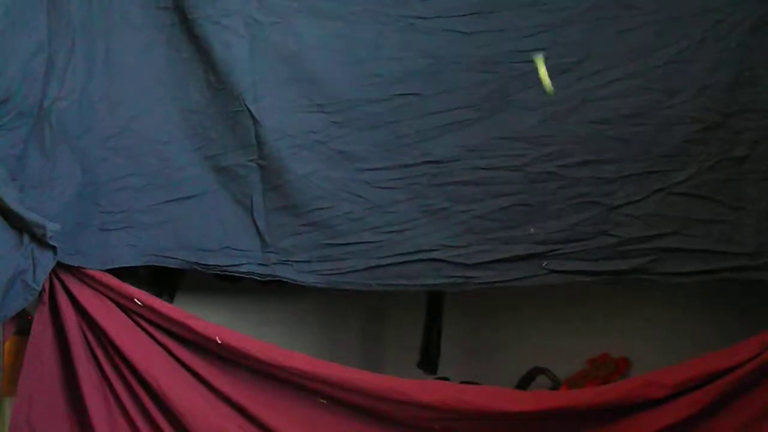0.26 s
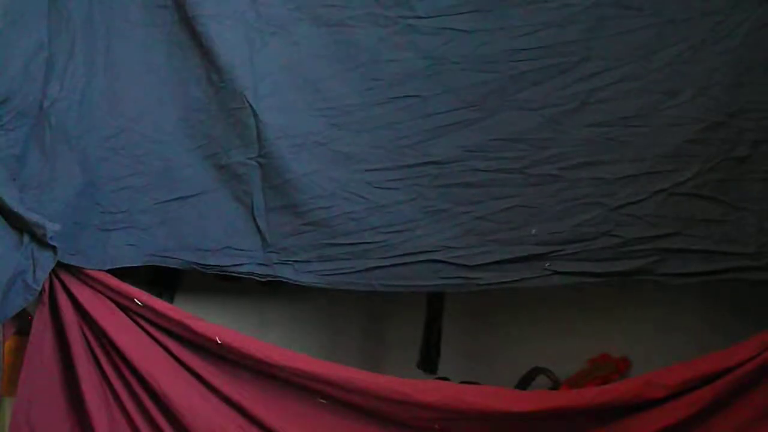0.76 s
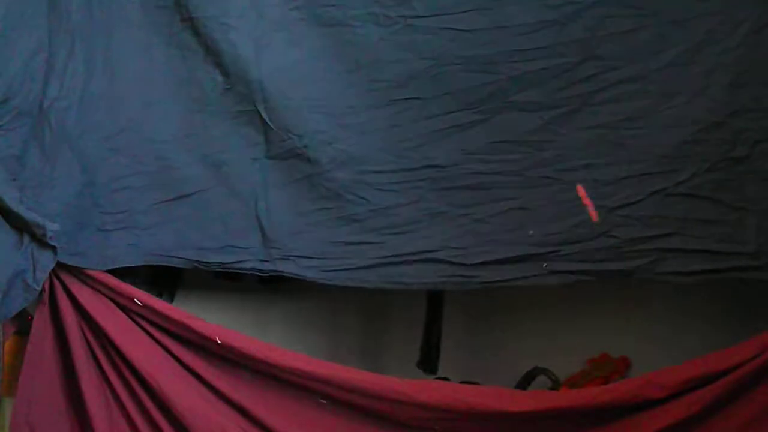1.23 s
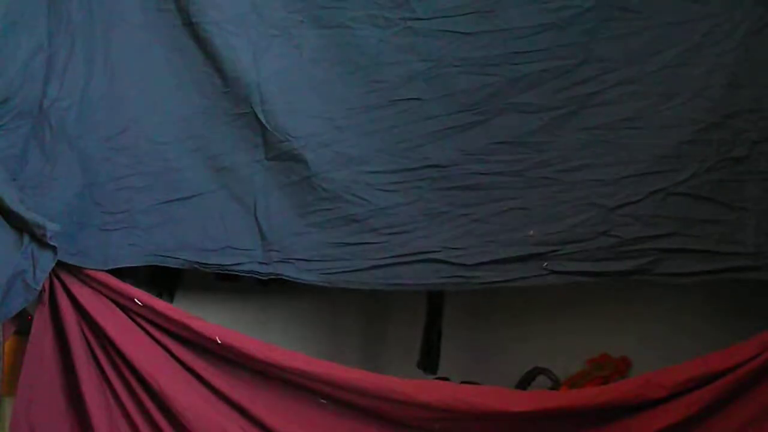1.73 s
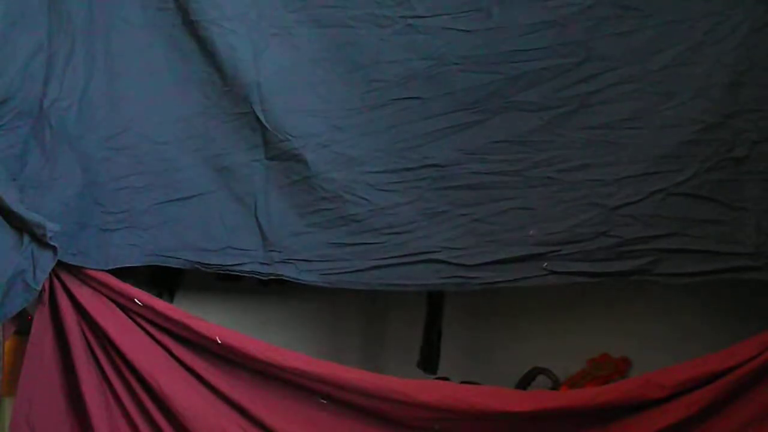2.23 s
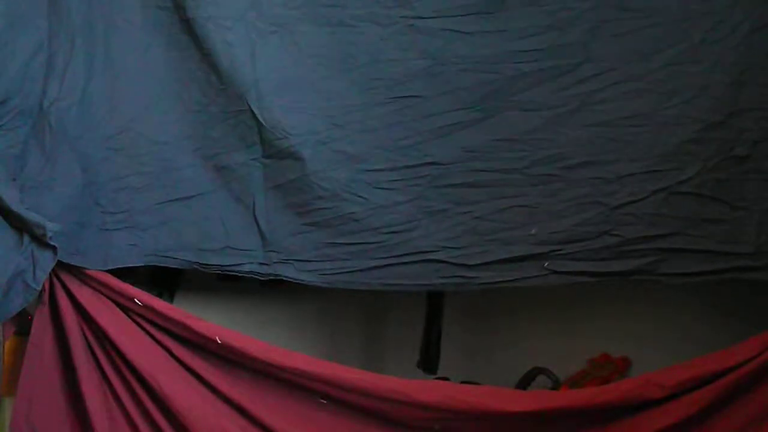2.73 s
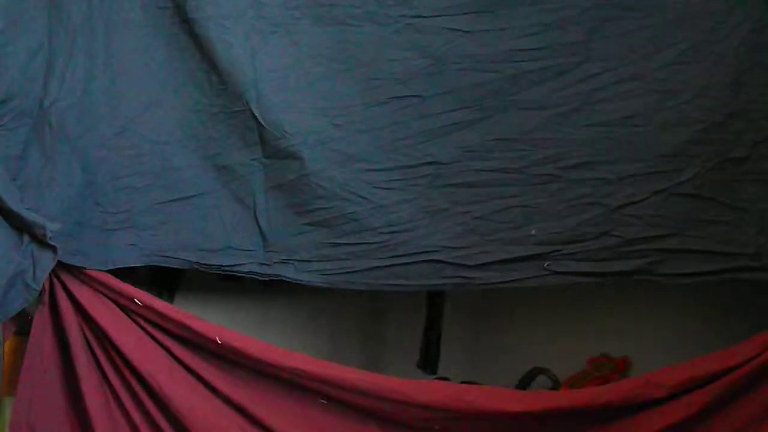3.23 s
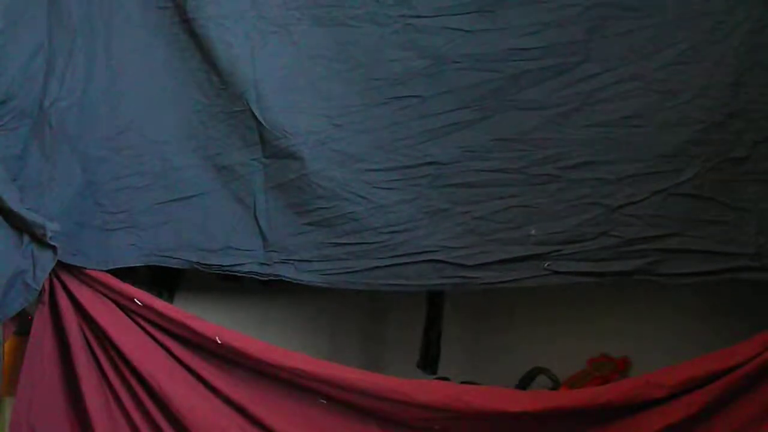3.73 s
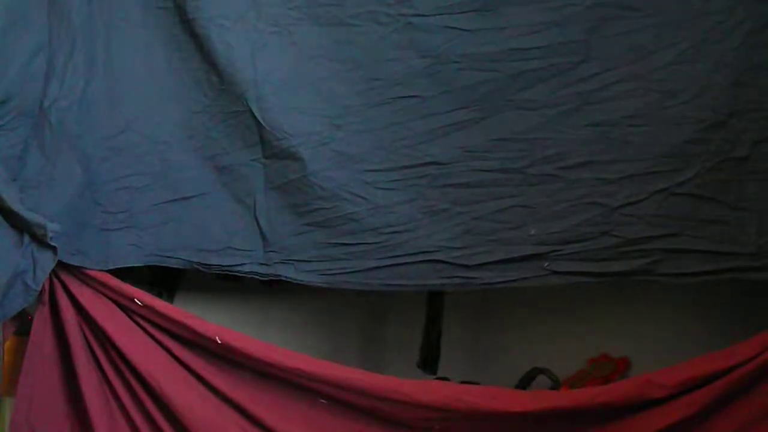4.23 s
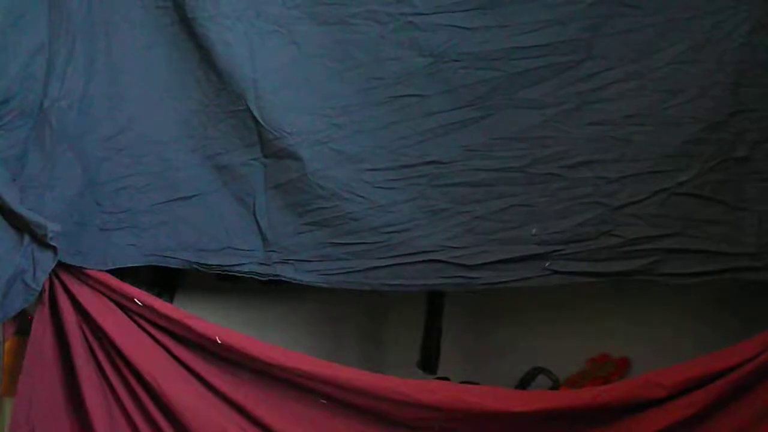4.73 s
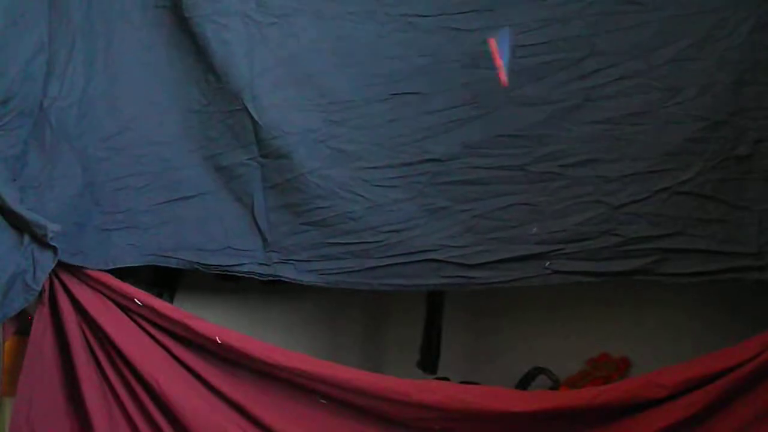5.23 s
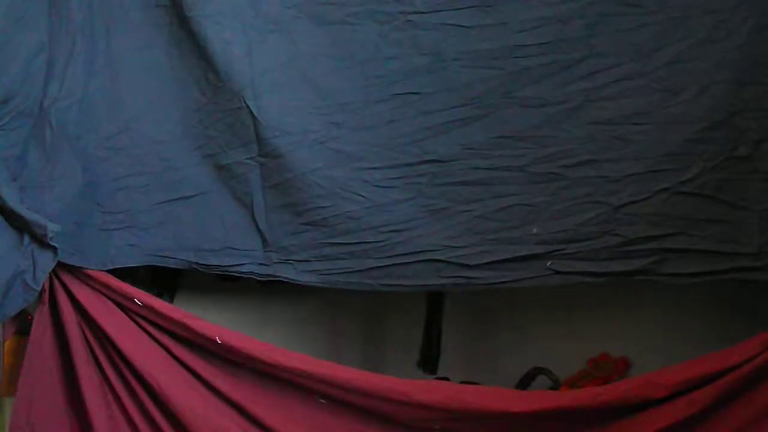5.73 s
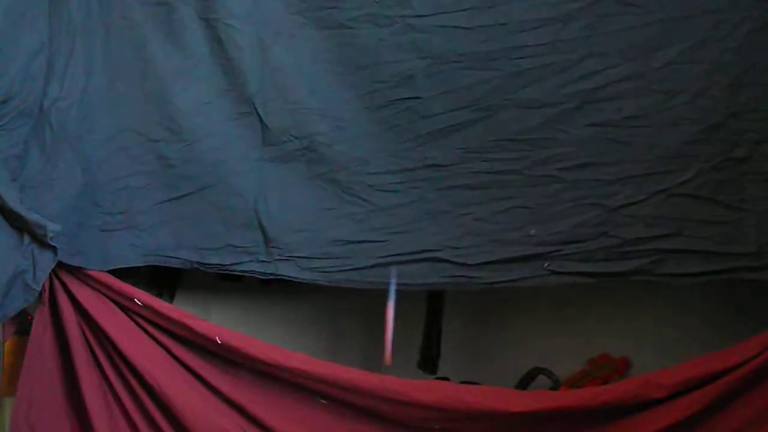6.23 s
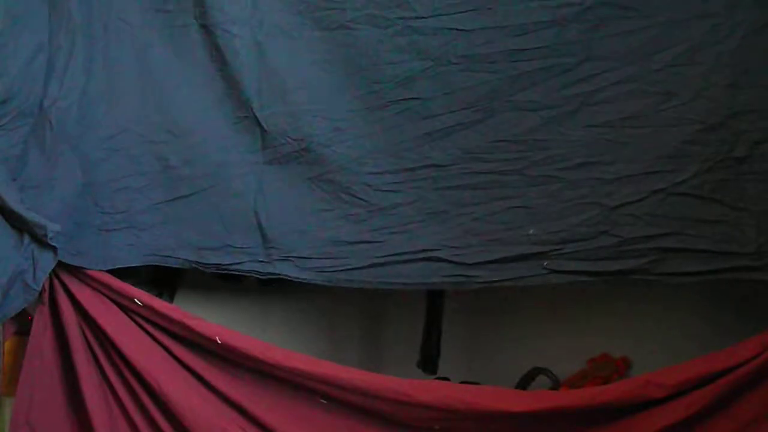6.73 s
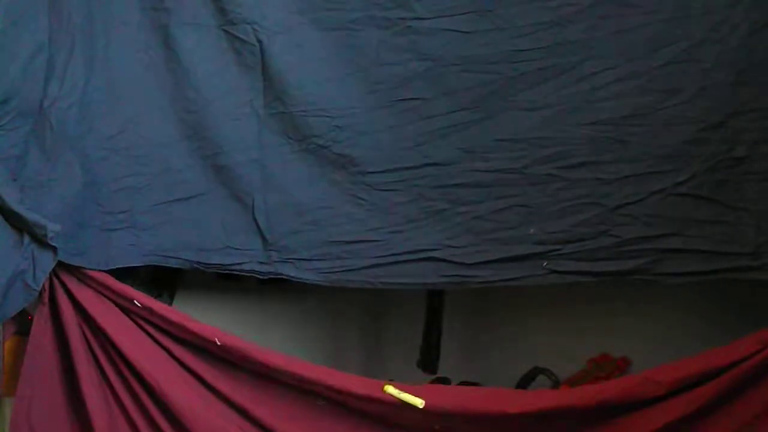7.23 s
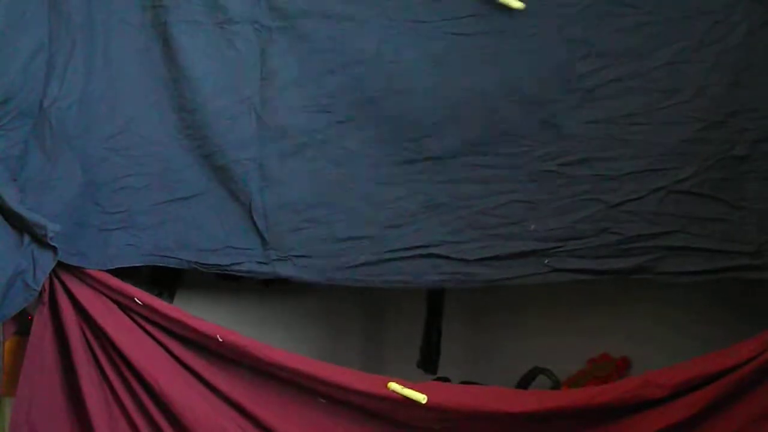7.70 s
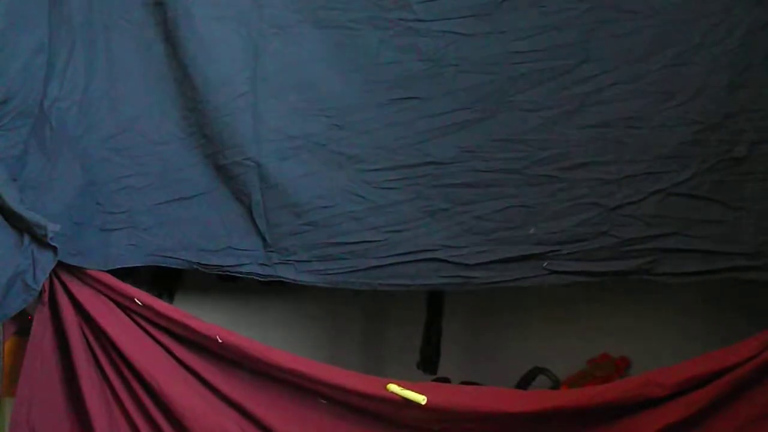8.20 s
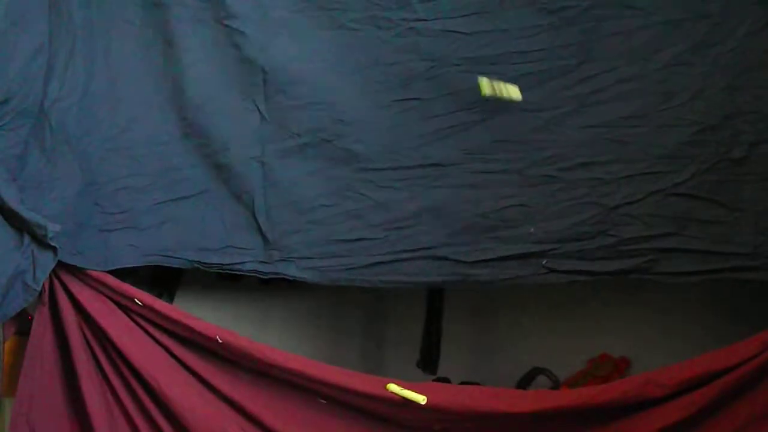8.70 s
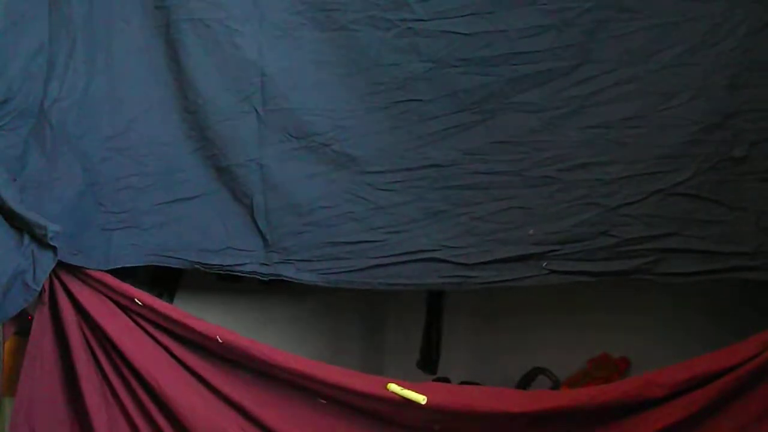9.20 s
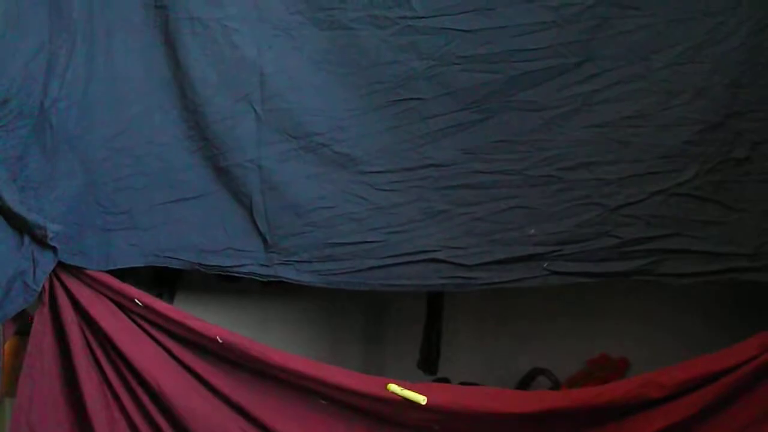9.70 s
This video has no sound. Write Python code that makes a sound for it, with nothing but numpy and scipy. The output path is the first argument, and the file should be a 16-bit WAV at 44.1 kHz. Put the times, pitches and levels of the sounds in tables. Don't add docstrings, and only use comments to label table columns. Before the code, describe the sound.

Quick cycles of scraping plastic pump, snapping catches and hard plunger thwacks, each shot's foam dart thumping a hanging sheet, over faint camera hiss.

```python
import sys
import numpy as np
from scipy import signal
from scipy.fft import rfft, irfft, next_fast_len
from scipy.io import wavfile
from scipy.ndimage import uniform_filter1d, map_coordinates

SR = 44100
rng = np.random.default_rng(int(sys.argv[2]) if len(sys.argv) > 2 else 0)


def invert_db(x):
    u = np.asarray(x, float) / 20
    return 10 ** u


def pcm_store(signal):
    levels = np.round(np.clip(np.atleast_2d(signal), -1, 1) * 32767)
    wavfile.write(sys.argv[1], SR, levels.astype(np.int16).T)


N = 438794

# freq_hz, density_db
HISS = [(25, 7), (74, 4.5), (176, -2.5), (600, -4), (1000, -9.5), (2000, -16), (4000, -15.5), (5500, -15.5),
        (7000, -10), (9000, -15), (11200, -5), (12500, -15.5), (14500, -21.5), (16000, -22)]
HISS_DB = -49.5
# freq_hz, level_db
STEADY_TONES = [(9523.5, -69), (9561, -67), (9597, -76)]
# freq_hz, level_db
FRAME_WHINE = [(3776, -61), (7550, -57), (11280, -60.5)]
FRAMES_PER_S, FIRST_FRAME_S = 30.025, .0111
# start_s, level_db, t60_s
JOLTS = [(.001, -44, 1.2), (3.672, -37, 1.3), (4.2, -44, 1.2), (6.25, -48, 0.69), (7.2, -56, .6),
         (8.3, -53, 1.1), (9.42, -41, 1.5)]
JOLT_RISE_S = .04
# freq_hz, t60_s
ROOM = [(100, 0.16), (300, 0.39), (600, 0.3), (1400, 0.25), (3700, 0.28), (9700, 0.16)]
SWAY_S, SWAY_SMOOTH_S = .00012, .004
EDGE_HZ = 15700

# freq_hz, width_hz, level_db
BODY = [(339.6, 44, -3), (620, 250, -39.5), (843, 260, 7.5), (1124, 170, 1.5), (1487, 205, 0.5)]
# freq_hz, width_hz, level_db
PANELS = [(1940, 5200, -12), (2875, 260, 5), (3260, 1610, 8), (4120, 780, -1)]
# freq_hz, width_hz, level_db
EDGES = [(5000, 620, -6), (6117, 490, 7), (7000, 650, -5), (8050, 190, -3.5), (10280, 1300, -5.5),
         (11800, 1800, -29.5), (14500, 2000, -27)]
# freq_hz, width_hz, level_db
TUBE = [(327, 21, -6.5), (490, 45, -11.5), (567, 48, 4), (745, 98, -8)]

# start_s, level_db, snap_db
DARTS = [(0.0, -9, -11.5), (0.967, -12, -11.5), (2.189, -11.5, -14), (4.924, -9.5, -23),
         (5.816, -7.5, -12.5), (6.71, -9, -13), (7.598, -6.5, -13), (8.553, -12.5, -18)]
# start_s, level_db, pitch_hz
DROPS = [(2.364, -20.5, 700), (2.721, -21.5, 330), (9.058, -23.5, 330), (9.362, -19.5, 540),
         (9.828, -17.5, 720)]

# start_s, length_s, first_db, last_db, body_db
RUBS = [(.785, 0.069, -36, -44, 3.5), (2.024, 0.04, -44, -30, -4), (2.25, 0.12, -33, -48, 0),
        (3.15, 0.039, -30, -30, 4), (3.661, 0.03, -36, -48, -7), (5.625, 0.096, -42, -46, 6),
        (7.434, 0.054, -30.5, -37, -4), (8.39, 0.036, -48, -29.5, -5), (8.67, 0.022, -26, -30.5, 3),
        (9.179, 0.029, -11.5, -10, -2), (9.266, 0.045, -41, -48, 3), (9.519, .076, -45, -45, 8),
        (9.609, 0.058, -38, -32, 0), (9.721, 0.13, -47, -50.5, 7.5), (8.565, 0.082, -50, -48, 5),
        (6.538, 0.055, -38, -40, -2)]
RUB_EDGE_DB = -9.5
# slack_s, bite_s, slack_db, pull_db
PULLS = [(.08, .149, -27, -15), (1.049, 1.087, -29.5, -18), (2.775, 2.859, -34, -28.5),
         (4.089, 4.14, -29, -15), (4.995, 5.038, -28, -15), (5.878, 5.911, -27, -14.5),
         (6.768, 6.824, -32.5, -15.5), (7.664, 7.729, -26, -18)]
# catch_s, catch_db, stop_s, stop_db
STOPS = [(.167, -18.5, .2195, -11), (1.1112, -19, 1.1635, -10), (2.87, -19, 2.9255, -14.5),
         (4.161, -22.5, 4.2171, -9), (5.053, -22.5, 5.098, -9), (5.9339, -17, 5.9873, -8.5),
         (6.8461, -18, 6.8967, -12), (7.7438, -18, 7.7916, -10)]
# slide_s, feed_s, slide_db, feed_end_db
PUSHES = [(0.338, .457, -39.5, -28), (1.259, 1.414, -41.5, -30), (4.331, 4.487, -42, -25),
          (5.229, 5.331, -39.5, -24.5), (6.126, 6.223, -32.5, -26), (7.029, 7.129, -35.5, -19),
          (7.942, 8.036, -31.5, -22.5)]
# jam_s, jam_db, lock_s, lock_db
LOCKS = [(.54, -11, 0.57, -11), (1.496, -11, 1.454, -28), (4.564, -10.5, 4.5795, -12.5),
         (5.4, -10.5, 5.4174, -12.5), (6.298, -13.5, 6.3144, -11), (7.195, -15.5, 7.2203, -14),
         (8.1, -9.5, 8.1135, -12.5)]
# body_db, edge_db
SLACK, PULL, SLIDE, FEED, JAM = (0.98, -12), (0.97, -4.5), (4, -7), (5, -10), (0, -0.49)
SLACK_GAP_S, SLACK_FADE_DB, PULL_FADE_DB = 0.006, -5.5, -10.5
SLIDE_GAP_S, SLIDE_END_DB, FEED_START_DB, JAM_S, JAM_FADE_DB = .012, -35, -30, 0.026, -14
RAM, RAM_LEAD_S, RAM_AFTER_S, RAM_DB, RAM_FADE_DB = (3.5, -4.5), .0118, .018, -5.5, -8

# start_s, blow_db, body_db
TICKS = [(0.0768, -27.5, 6), (0.4112, -42, 14), (1.056, -32, 0), (1.3128, -25, 1), (1.423, -35, 16.5),
         (2.2545, -30, -7), (2.284, -38, 13), (2.6172, -24.5, 4.5), (2.8137, -26.5, 0), (3.085, -30, -2.5),
         (3.1756, -28, 7), (3.29, -35.5, 1.5), (3.6733, -28, -29), (3.8975, -42, 12.5), (3.9339, -29.5, 6),
         (4.3637, -30, -20), (4.406, -26.5, 3.5), (4.43, -26.5, -22), (5.227, -26, -3), (5.2841, -46, 3.5),
         (6.1315, -26.5, -4), (6.773, -29, -5), (6.7919, -28, 4), (7.085, -34, 9), (9.086, -26, 2),
         (9.1331, -24, 3.5), (9.5455, -33.5, 18), (9.5672, -28.5, 9.5), (9.6182, -23, -0.5),
         (9.7368, -28, 1)]
# start_s, blow_db, body_db
MORE_TICKS = [(4.7852, -30.5, -2), (5.6679, -31, 2.5), (6.486, -35, 9.5), (6.538, -33.5, 5), (7.437, -29, 3.5),
              (8.3835, -28, 3.5), (8.642, -42, 8), (9.8061, -42, 14), (3.385, -42.5, -14), (7.92, -31.5, 4),
              (8.855, -47, 9), (9.045, -43, 0)]
TICK_EDGE_DB, TICK_RISE_S = -4.5, 0.0017
# start_s, blow_db, body_db, edge_db
KNOCKS = [(.1452, -21, 11.5, 3), (4.143, -21, -1, 6), (.518, -28.5, 17.5, -2), (3.1519, -27.5, 3.5, 0.5),
          (4.539, -35, -1.5, -10), (5.0151, -24, 2, -14), (5.3416, -32, 13.5, 4), (5.3804, -27.5, 9.5, -4),
          (5.8985, -23.5, 4, -18), (6.23, -33, 13, 6.5), (6.2766, -29, 10.5, -3), (7.041, -41, -0.5, 10.5),
          (6.887, -19.5, 6, 0.5), (7.1429, -34, -4, -5), (7.2044, -18.5, 10, 5.5), (7.7258, -23, 15.5, 5),
          (8.0816, -24.5, 8, -3), (8.6756, -20.5, 0.5, -29), (9.1823, -12.5, -2.5, -8),
          (9.2906, -29, 10, -9), (9.3511, -23, 6, -27), (9.3624, -12.5, 3.5, -11),
          (9.5327, -23.5, -12, -26), (9.6566, -22, 6, -8), (9.8369, -36, 8, -19)]
KNOCK_RISE_S = .004
# body_db, edge_db, rise_s
CATCH, STOP, LOCK = (9.1, 1, 0.0097), (4.8, -5.5, 0.0024), (5.6, -8, 0.0054)
DIE_S, CHATTER_DB, CHATTER_S = .016, -12.5, 0.094

# start_s, level_db, first_hz, crack_db, tube_db
SLAMS = [(.875, 3, 788, -13.5, -16.5), (2.086, -1.3, 730, -14, -15), (4.8328, 0, 906, -12, -16.5),
         (5.724, 1, 918, -11, -17.5), (6.614, 1.5, 903, -10, -19.5), (7.507, -1, 618, -10, -15.5),
         (8.461, -6, 711, -11, -22.5)]
LANDED_HZ = 299.4
PUFF_HZ, PUFF_DB, PUFF_S = 130.4, -16, .012


def evened(x):
    return x / np.sqrt(np.mean(x ** 2) + 1e-20)


def read(points, hz):
    f, value = np.transpose(points)
    return np.interp(np.log(hz + 1), np.log(f + 1), value)


def add(mix, s, sound):
    part = mix[max(round(s * SR), 0):][:len(sound)]
    part += sound[:len(part)]


def coloured(points):
    size = next_fast_len(N)
    spectrum = rfft(rng.standard_normal(size))
    gain = invert_db(read(points, np.fft.rfftfreq(size, 1 / SR)))
    return evened(irfft(spectrum * gain, size)[:N])


def electronics():
    t = np.arange(N) / SR
    hiss = invert_db(HISS_DB) * coloured(HISS)
    tones = sum(invert_db(db + 5.5) * np.sin(2 * np.pi * hz * t) for hz, db in STEADY_TONES)
    frame_cycle = np.cos(2 * np.pi * FRAMES_PER_S * (t - FIRST_FRAME_S))
    busy = np.clip(3.5 * (frame_cycle - .35), 0, 1)
    drift = 1 + .0012 * evened(uniform_filter1d(rng.standard_normal(N), 900))
    clock = np.cumsum(drift) / SR
    whine = sum(invert_db(db + 3) * np.sin(2 * np.pi * hz * clock) for hz, db in FRAME_WHINE)
    return hiss + tones + busy * whine


def stand_wobble():
    t, level = np.arange(N) / SR, np.zeros(N)
    for s, db, t60 in JOLTS:
        rise = np.clip(1 + (t - s) / JOLT_RISE_S, 0, 1)
        level += rise * invert_db(db - 60 * np.maximum(t - s, 0) / t60)
    return level * coloured([(8, -35.0), (22, 9), (42, -2.5), (62, 4.5), (85, -12.5), (130, -39.5), (300, -105)])


def room(x):
    out, at = np.zeros(N), np.arange(180, SR // 2 - 20, 20)
    for k in range(3):
        taps = np.zeros(SR // 2)
        taps[at + rng.integers(0, 20, len(at))] = rng.choice([-1., 1.], len(at))
        hz, t, z = signal.stft(taps, SR, nperseg=256)
        decay = invert_db(-60 * t / read(ROOM, hz)[:, None])
        tail = signal.istft(z * decay, SR, nperseg=256)[1]
        share = np.sqrt(2 / 3) * np.cos(np.pi * (23 * np.arange(N) / SR + k / 3))
        out += signal.oaconvolve(x * share, tail / np.linalg.norm(tail))[:N]
    return out


def swaying(echoes):
    width = round(SWAY_SMOOTH_S * SR)
    drift = uniform_filter1d(uniform_filter1d(rng.standard_normal(N), width), width)
    return map_coordinates(echoes, [np.arange(N) + SWAY_S * SR * evened(drift)])


def ring(modes, spread=0., seconds=.025):
    t = np.arange(0, seconds, 1 / SR)
    hz, width, db = np.transpose(modes)[:, :, None]
    shift, weight = rng.standard_normal((2, len(hz), 1)) * spread
    level = invert_db(db + 35 * weight) * np.sqrt(width)
    waves = level * np.exp(-np.pi * width * t) * np.sin(2 * np.pi * hz * (1 + shift) * t)
    out = waves.sum(0)
    return out / np.linalg.norm(out)


def grit(shape, spread_db):
    size_db = spread_db * np.minimum(rng.exponential(1, shape[-1]), 4)
    return evened(rng.standard_normal(shape) * invert_db(size_db))


def shell(contact_db, body_db, edge_db, grit_db):
    contacts = grit((3, SR // 5), grit_db)[:, :len(contact_db)]
    drive = invert_db(contact_db) * contacts * invert_db(np.array([[body_db], [0], [edge_db]]))
    return sum(signal.oaconvolve(d, ring(modes, 0.041)) for d, modes in zip(drive, (BODY, PANELS, EDGES)))


def dropped_darts():
    t, out = np.arange(SR // 10) / SR, np.zeros(N)
    for s, db, hz in DROPS:
        tumble = rng.standard_normal(len(t)) * invert_db(db - 60 * t / .07) * np.minimum(t / .003, 1)
        tumble = uniform_filter1d(tumble, SR // (2 * hz))
        thump = signal.oaconvolve(tumble, ring([(hz, 330, 0), (1.7 * hz, 1100, -7)]))
        add(out, s, np.diff(thump) * SR / (2 * np.pi * hz))
    return out


def dart_hits():
    t, out = np.arange(SR // 10) / SR, np.zeros(N)
    push = np.sin(2 * np.pi * 1.72 * np.sqrt(125 * t)) * np.exp(-t / 0.0025)
    swing = np.sin(2 * np.pi * 95 * t) * np.exp(-t / .007)
    hum = np.sin(2 * np.pi * 62 * t) * np.exp(-t / 0.16)
    rebound = uniform_filter1d(push, 30) + 0.43 * swing
    for s, db, snap_db in DARTS:
        burst = rng.standard_normal(len(t)) * np.exp(-t / 0.0052)
        snap = signal.oaconvolve(burst, ring(BODY + PANELS))[:len(t)]
        add(out, s + .0007, invert_db(db) * (push + invert_db(snap_db) * snap + 0.13 * swing + 0.035 * hum))
        add(out, s + .019, invert_db(db - 14.5) * rebound)
    return out


def stages():
    for start, length, first_db, last_db, body_db in RUBS:
        yield start, start + length, first_db, last_db, body_db, RUB_EDGE_DB
    for (slack, bite, slack_db, pull_db), (*_, stop, stop_db) in zip(PULLS, STOPS):
        ram, ram_db = stop - RAM_LEAD_S, stop_db + RAM_DB
        yield slack, bite - SLACK_GAP_S, slack_db, slack_db + SLACK_FADE_DB, *SLACK
        yield bite, ram, pull_db, pull_db + PULL_FADE_DB, *PULL
        yield ram, stop + RAM_AFTER_S, ram_db, ram_db + RAM_FADE_DB, *RAM
    for (slide, feed, slide_db, feed_db), (jam, jam_db, *_) in zip(PUSHES, LOCKS):
        yield slide, feed - SLIDE_GAP_S, slide_db, SLIDE_END_DB, *SLIDE
        yield feed, jam, FEED_START_DB, feed_db, *FEED
        yield jam, jam + JAM_S, jam_db, jam_db + JAM_FADE_DB, *JAM


def strokes():
    out = np.zeros(N)
    for start, end, first_db, last_db, body_db, edge_db in stages():
        clumps_db = 3.0 * evened(uniform_filter1d(rng.standard_normal(SR // 5), 150))
        contour_db = np.linspace(first_db, last_db, round((end - start) * SR)) - 5.0
        add(out, start, shell(contour_db + clumps_db[:len(contour_db)], body_db, edge_db, 3.3))
    return out


def knocks():
    out, t = np.zeros(N), np.arange(-.03, .04, 1 / SR)
    blows = [(*row[:2], *CATCH) for row in STOPS]
    blows += [(*row[2:], *STOP) for row in STOPS]
    blows += [(*row[2:], *LOCK) for row in LOCKS]
    blows += [(*row, KNOCK_RISE_S) for row in KNOCKS]
    blows += [(*row, TICK_EDGE_DB, TICK_RISE_S) for row in TICKS + MORE_TICKS]
    decay_db = np.maximum(-60 * t / DIE_S, CHATTER_DB - 60 * t / CHATTER_S)
    for s, blow_db, body_db, edge_db, rise in blows:
        swell_db = 18 * t / np.clip(rise, .0005, .02)
        contour_db = blow_db + 1.0 + np.where(t < 0, swell_db, decay_db)
        add(out, s + t[0], shell(contour_db, body_db, edge_db, 1.9))
    return out


def release_cracks():
    out, t = np.zeros(N), np.arange(0, .03, 1 / SR)
    bounce_s = [0, .0012, .005, .007, .013, .0165, .03]
    bounce_db = np.interp(t, bounce_s, [-6.5, -4.5, -9.5, -3.5, -7.5, -3.5, -24])
    for s, *_, crack_db, _ in SLAMS:
        add(out, s - .0058, shell(crack_db + bounce_db, 0.63, -0.04, 0.91))
    return out


def plunger():
    out, t = np.zeros(N), np.arange(SR // 4) / SR
    u = np.arange(0, 1, 1 / (0.01288 * SR))
    fade = signal.windows.tukey(len(u), .3) * (1 - 0.62 * u)
    puff = invert_db(PUFF_DB) * np.sin(2 * np.pi * PUFF_HZ * t) * np.exp(-t / PUFF_S)
    for s, db, first_hz, _, tube_db in SLAMS:
        flutter = 1 + 0.24 * evened(uniform_filter1d(rng.standard_normal(SR // 20), 60))[:len(u)]
        pitch_hz = LANDED_HZ + (first_hz - LANDED_HZ) * np.exp(-u / 0.273)
        phase = 2 * np.pi * np.cumsum(pitch_hz * flutter) / SR
        overtones = 0.76 * np.sin(2.7 * phase) + 0.13 * np.sin(2.5 * phase)
        add(out, s - .0006, invert_db(db) * (np.sin(phase) + overtones) * fade)
        add(out, s, invert_db(db) * puff)
        shudder = rng.standard_normal(len(t)) * invert_db(tube_db - 60 * t / 0.31)
        add(out, s + 0.00812, signal.oaconvolve(shudder, ring(TUBE, 0.018, seconds=0.065)))
    return out


def scene():
    background = electronics() + stand_wobble()
    thuds = dropped_darts() + dart_hits()
    thin = signal.butter(2, 520, "highpass", fs=SR, output="sos")
    parts = signal.sosfilt(thin, strokes() + knocks() + release_cracks())
    slams = plunger()
    echoes = room(invert_db(-6) * parts + invert_db(-17.0) * slams + invert_db(-5.5) * thuds)
    return (background + swaying(echoes) + invert_db(1.0) * thuds + parts + slams)[None]


def top_cut(x):
    return signal.sosfilt(signal.butter(12, 16470, fs=SR, output="sos"), x)


def record(dry):
    clipped = np.clip(dry, -1, 1)
    lowpass = signal.firwin(511, EDGE_HZ, window=("kaiser", 7), fs=SR)
    limited = signal.oaconvolve(clipped, lowpass[None], "same")
    return top_cut(np.clip(limited, -1, 1))


dry = scene()
out = record(dry)
pcm_store(out)
```